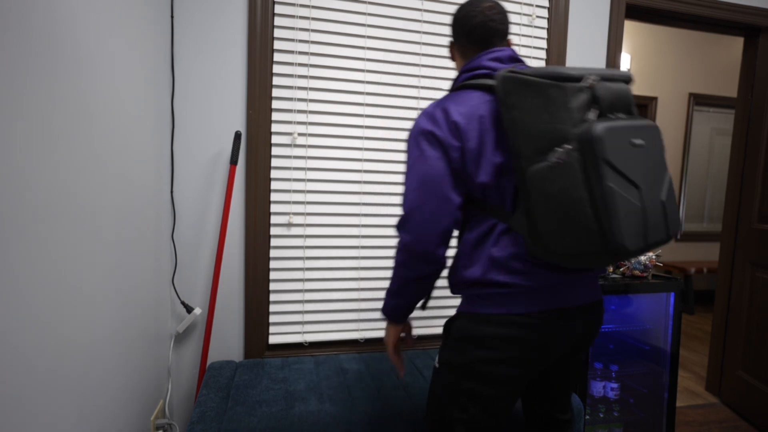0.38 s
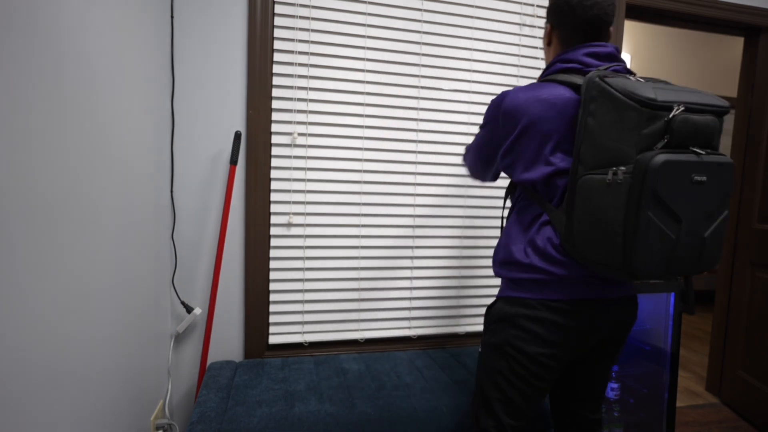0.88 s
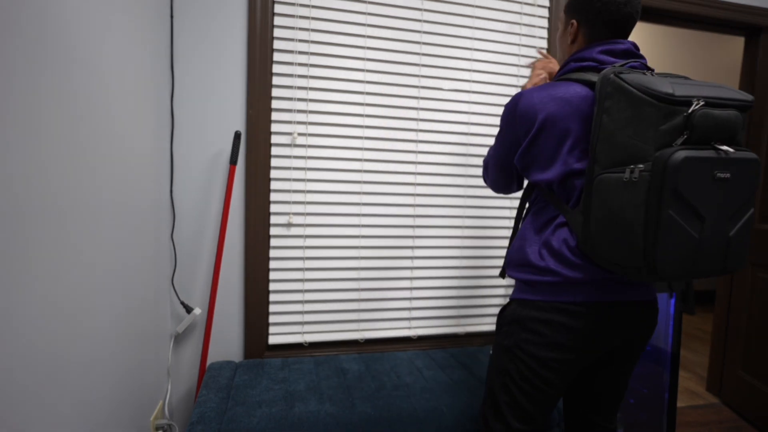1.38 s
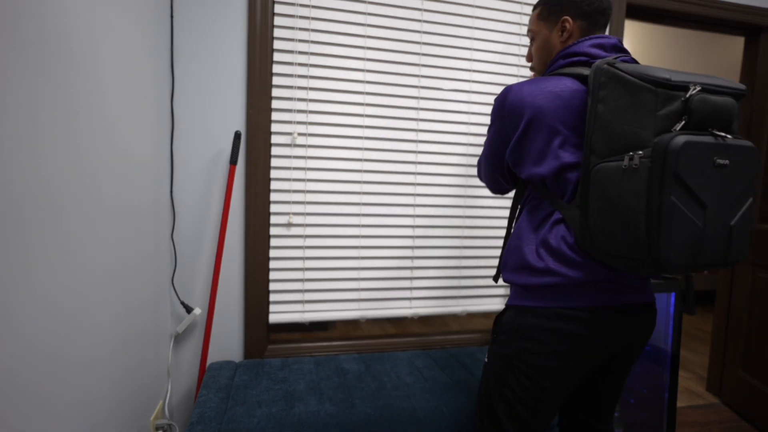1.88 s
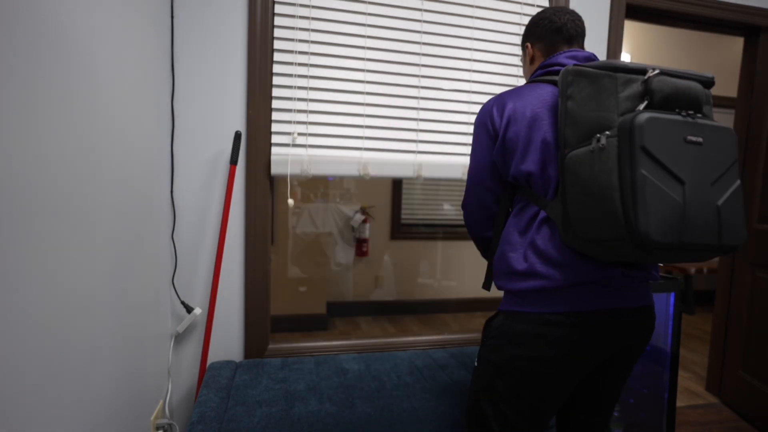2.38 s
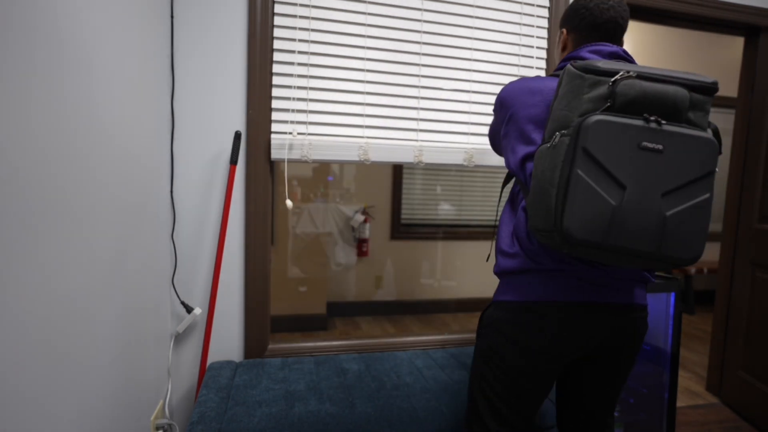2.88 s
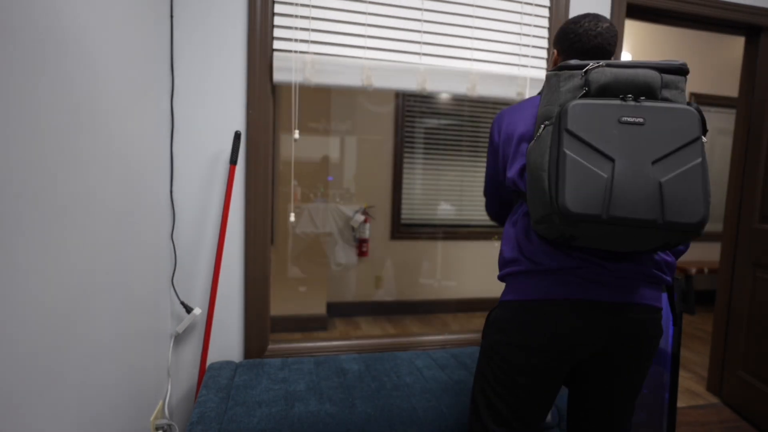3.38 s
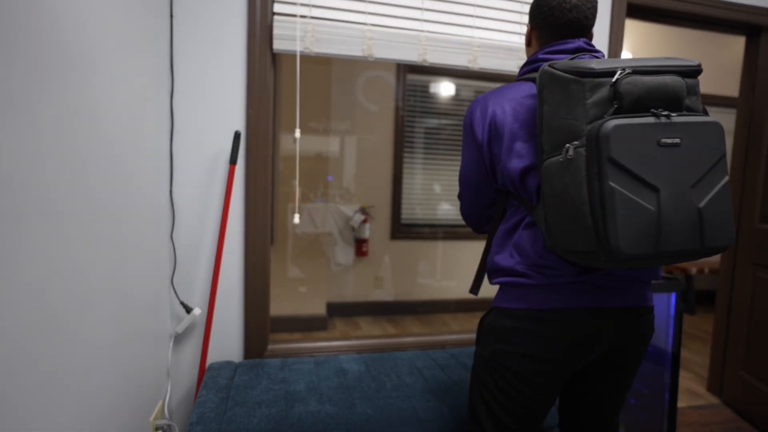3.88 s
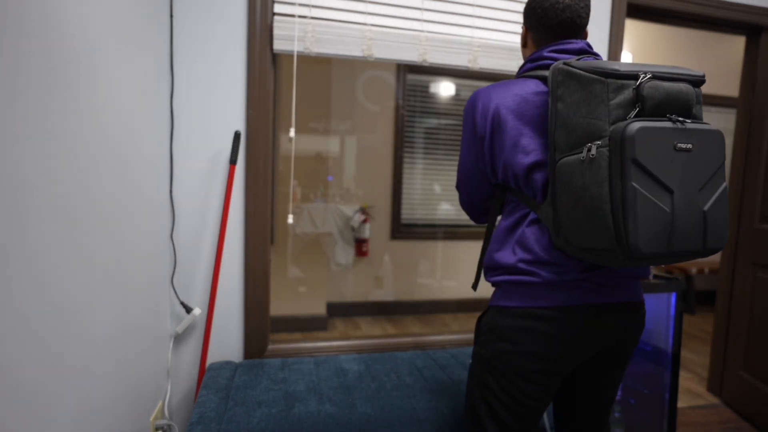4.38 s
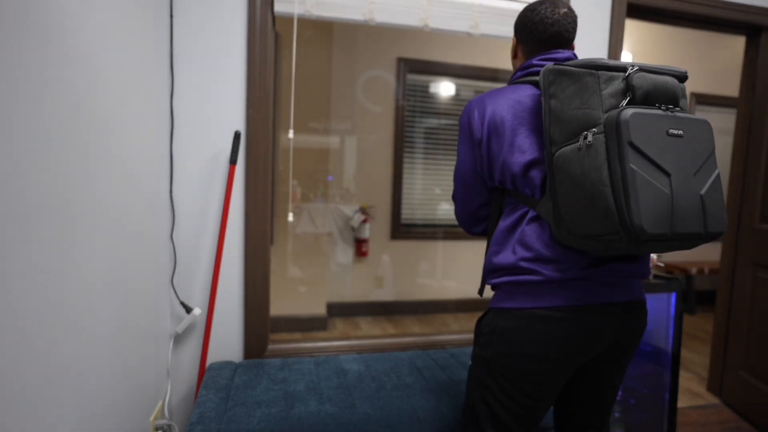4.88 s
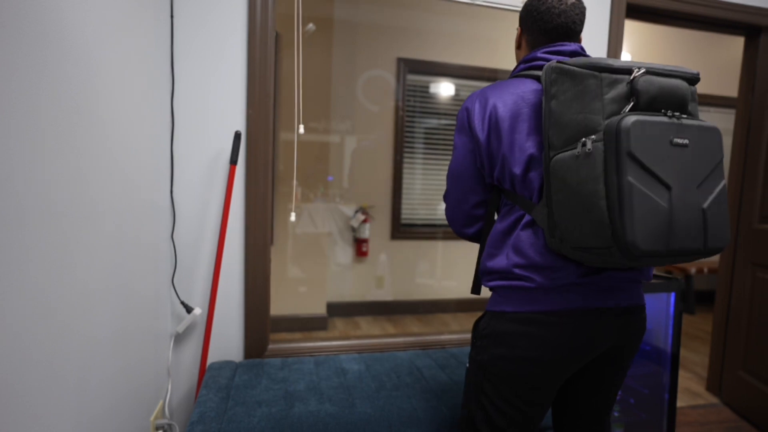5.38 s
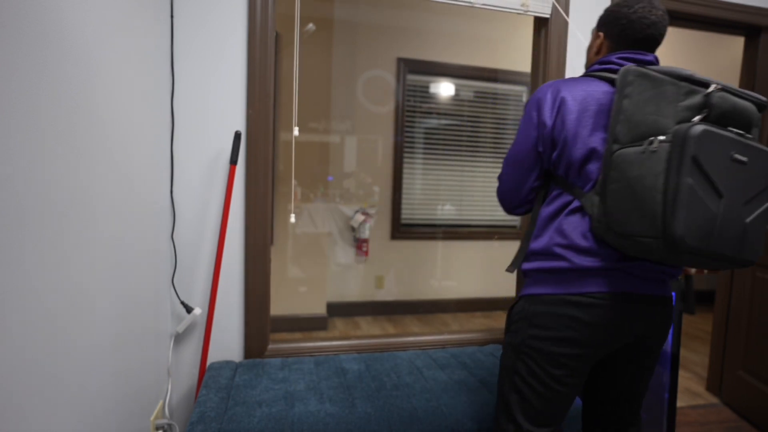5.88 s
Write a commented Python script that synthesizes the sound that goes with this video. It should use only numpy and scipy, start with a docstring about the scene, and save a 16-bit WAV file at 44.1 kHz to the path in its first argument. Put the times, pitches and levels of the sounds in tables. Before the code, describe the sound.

In a small quiet room, a slatted blind clatters up in one loud haul, then two weaker pulls, with cord rustle, a bag thump and low hum.

```python
"""Pulling up a window blind

Someone with a backpack pulls up a slatted blind in a small, quiet room; the sound leans to the left.
The slats clack and jostle: bouncing contacts make them ring. Cord and cloth rustle as coloured grainy noise.
Small metal parts ting as single tones, the frame knocks, a bag thumps low and air puffs at the microphone.
Underneath, a fridge and ventilation hum as shaped noise; random echo taps make the room."""
import sys
import numpy as np
from scipy import signal
from scipy.fft import rfft, irfft
from scipy.io import wavfile
from scipy.ndimage import uniform_filter1d

SR = 44100
rng = np.random.default_rng(int(sys.argv[2]) if len(sys.argv) > 2 else 0)


def amplitude_ratio(level_db):
    """Convert a level in decibels to the matching linear amplitude (field) ratio."""
    exponent = np.asarray(level_db, float) / 20
    return 10 ** exponent


def transcribe(u):
    """Save the signal u as a 16-bit wav file named by the first command-line argument.

    u: samples, shape (n,) or (channels, n), limited to [-1, 1]; the rate is SR.
    q: integer samples, one column per channel.
    """
    v = np.clip(np.atleast_2d(u).T, -1, 1)
    q = np.round(v * 32767).astype(np.int16)
    wavfile.write(sys.argv[1], SR, q)


N = 275184  # length of the scene [samples]

# low ringing of slats and rail: (frequency [Hz], width [Hz], relative level [dB])
LOW_BODY = [(350, 96, -18.5), (572, 180, 1.5), (702, 70, 3), (790, 190, 6), (880, 230, 4.5),
            (1015, 100, -3), (1143, 280, -15.5), (1500, 350, -4.5)]
# bright colour shared by slats, hiss and ticks: (frequency [Hz], relative level [dB])
BRIGHT_COLOUR = [(3000, -30), (5000, -8.5), (6500, 1.5), (8600, 1), (11600, 3), (14400, -0.5),
                 (15800, -11.5)]
# duller colour of cloth and cord rubbing: (frequency [Hz], relative level [dB])
RUB_COLOUR = [(700, -33.5), (1300, -2.5), (2000, -2), (3000, -3.5), (4500, -5), (7000, -14), (10000, -39.5)]
# how hard the cord is hauled, one curve for each of the three pulls: (time [s], effort [dB])
PULLS = [
    [(1.75, -105), (1.968, -71), (2.074, -54), (2.216, -39.5), (2.29, -41), (2.346, -44.5), (2.526, -72.5),
     (2.65, -103)],
    [(3.05, -79.5), (3.184, -66), (3.316, -57), (3.372, -49.5), (3.428, -58), (3.542, -61), (3.602, -76.5),
     (3.7, -97.5)],
    [(4.69, -87), (4.715, -63.5), (4.77, -71), (4.879, -64.5), (4.95, -68.5), (5.07, -67.5), (5.1, -69),
     (5.19, -64.5), (5.237, -73), (5.32, -88)],
]


def evened(x):
    """Scales a sound to an rms of 1."""
    return x / np.sqrt(np.mean(x ** 2) + 1e-20)


def read(points, hz):
    """Reads a table of (frequency, value) between its points, on a log-frequency axis."""
    f, value = np.transpose(points)
    return np.interp(np.log(hz + 1), np.log(f + 1), value)


def curve(s, db):
    """Draws a control in dB for every sample, silent outside its span."""
    return np.interp(np.arange(N) / SR, s, db, left=-300, right=-300)


def bump(s, half_s):
    """A smooth rise and fall about time s."""
    return np.exp(-((np.arange(N) / SR - s) / half_s) ** 2)


def swell(t, rise_ms, t60):
    """A soft start and an exponential fall, by 60 dB in t60 seconds."""
    rise = 1 - np.exp(-1000 * t / max(rise_ms, .02))
    return rise * amplitude_ratio(-60 * t / max(t60, .004))


def add(mix, s, sound):
    """Mixes a sound in at time s, which may lie before the start."""
    at = round(s * SR)
    part = mix[max(at, 0):][:len(sound) + min(at, 0)]
    part += sound[max(-at, 0):][:len(part)]


def resonate(x, hz, width):
    """A two-pole resonance of gain 1 at its centre."""
    return signal.lfilter(*signal.iirpeak(hz, hz / max(width, 1), SR), x)


def ring(x, body, chance_db=0, edge_hz=6000):
    """Adds up an object's resonances, each with its own chance level, dulled above the edge."""
    each_db = chance_db + np.zeros(len(body))
    modes = 0
    for (hz, width, db), chance in zip(body, each_db):
        modes = modes + amplitude_ratio(db + chance) * resonate(x, hz, width) / np.sqrt(width)
    return signal.lfilter(*signal.butter(2, edge_hz, fs=SR), modes)


def colour(x, points):
    """Filters with the given spectrum; nothing sounds before its cause."""
    hz = np.abs(np.fft.fftfreq(2048, 1 / SR))
    log_gain = np.log(amplitude_ratio(np.maximum(read(points, hz), -100)))
    # the Hilbert transform finds the phase that puts the energy as early as possible
    taps = np.fft.ifft(np.exp(np.conj(signal.hilbert(log_gain)))).real[:1024]
    return signal.oaconvolve(x, taps)[:len(x)]


def crackle(per_s, spread_db, hiss):
    """Sparse clicks of uneven size in a bed of noise."""
    size = amplitude_ratio(spread_db * np.minimum(rng.exponential(1, N), 4)) * rng.choice([-1, 1], N)
    clicks = size * (rng.random(N) < per_s / SR)
    return evened(evened(clicks) + hiss * rng.standard_normal(N))


def room_tone():
    """Ventilation is shaped noise; the low hum of motors is noise through narrow resonances."""
    # colour of the ventilation: (frequency [Hz], relative level [dB])
    air_colour = [(12, -42.5), (20, 4), (53, 4), (123, -7), (167, -6), (469, -14), (603, -32.5), (943, -21),
                  (1650, -51), (2720, -30), (4030, -43.5), (14100, -43.5), (15800, -45.5)]
    # two hum bands, lower and upper: (frequency [Hz], width of each resonance [Hz])
    hum_bands = [(60, 4), (118, 18)]
    # resting level of the lower and the upper band [dB]
    hum_db = [-69, -68.5]
    # the level of the low noise drifts by chance:
    # (time [s], half length [s], lower band change [dB], upper band change [dB])
    level_drifts = [(.2, .2, -0.5, -1), (0.634, .12, -10, -4.5), (1.055, 0.22, 1, -0.5),
                    (2.596, 0.094, 12, -5.5), (3.08, 0.087, 8.5, -15), (3.2, 0.091, -13, -1),
                    (3.633, 0.17, 7, 8.5), (4.298, 0.79, -5, -3.5), (4.929, 0.049, 5, 3),
                    (5.62, 0.17, 5, 3), (6.097, 0.18, -13, 6.5)]
    hz = np.fft.rfftfreq(N, 1 / SR)
    air = irfft(rfft(rng.standard_normal(N)) * amplitude_ratio(read(air_colour, hz)), N)
    levels_db = np.c_[hum_db] + sum(np.c_[db] * bump(s, half_s) for s, half_s, *db in level_drifts)
    out = amplitude_ratio(-67) * evened(air)
    for level_db, (centre, width) in zip(levels_db, hum_bands):
        once = resonate(rng.standard_normal(N), centre, width)
        out += amplitude_ratio(level_db) * evened(resonate(once, centre, width))
    return out


def puffs():
    """Air from closing slats pushes on the microphone, then the pressure swings back more slowly."""
    # (time [s], level before the factor [dB], time until the pressure crosses zero [ms], signed factor)
    puff_list = [(2.150, -57, 9.4, 0.67), (2.1855, -11, 1.98, 0.55), (2.211, -33, 2.56, -1),
                 (2.268, -31.5, 3.1, -2.2), (2.2981, -5.5, 0.98, 0.73), (5.232, -22, 1.57, 0.074)]
    out = np.zeros(N)
    for s, db, ms, factor in puff_list:
        u = np.arange(4000) / SR / (ms / 1000)
        push = np.sin(np.pi * u ** 0.35) * np.exp(-.55 * u) * (1 - np.exp(-u / 0.16))
        add(out, s, factor * amplitude_ratio(db) * 1.32 * push)
    return out


def thumps():
    """Bag and pull make couch and window frame ring low for a few cycles, as fading sines."""
    # one row a mode: (time [s], level [dB], frequency [Hz], t60 [s], rise [ms])
    thump_list = [(-.011, -27.5, 66, 0.14, 1.7), (.068, -31, 110, 0.14, 14), (.004, -52, 340, 0.099, 3),
                  (.02, -42.5, 526, 0.058, 11), (0.068, -45, 209, 0.089, 6), (.068, -52, 496, 0.043, 2.8),
                  (5.229, -53, 176, 0.19, 2)]
    out, t = np.zeros(N), np.arange(SR // 2) / SR
    for s, db, hz, t60, rise_ms in thump_list:
        add(out, s, amplitude_ratio(db) * swell(t, rise_ms, t60) * -np.sin(2 * np.pi * hz * t))
    return out


def tings():
    """Loose metal rings with one mode each, roughened by the rattling contact."""
    # the parts rattle: (time [s], level [dB], part)
    ting_list = [(.043, -66, "tab"), (.15, -82, "slider"), (.177, -74, "tab"), (.235, -76, "slider"),
                 (.538, -72, "tab"), (.596, -73, "tab"), (.60, -82, "ring"), (1.045, -79, "ring"),
                 (1.05, -78, "pawl"), (1.055, -73, "tab"), (1.06, -68, "clip"), (1.163, -57, "clip"),
                 (1.562, -64, "ring"), (3.340, -55, "pin"), (3.342, -50, "pawl"), (3.357, -52, "pawl"),
                 (3.368, -54, "pin"), (4.706, -60, "pin"), (4.706, -60, "pawl"), (4.72, -60, "latch"),
                 (4.872, -57, "lock"), (4.915, -63, "roller"), (4.937, -60, "roller"), (5.178, -64, "lock"),
                 (5.961, -75, "tab")]
    # small metal parts by name: (frequency [Hz], t60 [s])
    metal_parts = dict(tab=(14650, .13), slider=(7100, .15), ring=(6300, .09), pawl=(8550, .06),
                   pin=(11200, .13), clip=(2600, .01), lock=(3080, .045), roller=(4300, .03),
                   latch=(2200, .08))
    out, t = np.zeros(N), np.arange(SR // 3) / SR
    for s, db, part in ting_list:
        hz, t60 = metal_parts[part]
        rattle = evened(uniform_filter1d(rng.standard_normal(len(t)), size=160))
        tone = (1 + .7 * rattle) * np.sin(2 * np.pi * hz * t)
        add(out, s, amplitude_ratio(db) * swell(t, 1.5, t60) * tone)
    return out


def knocks():
    """The pull knocks on the wooden frame, whose many modes blur into a short coloured burst."""
    # (time [s], level [dB], t60 [s], hard-tip tick relative to the body's peak [dB], rise [ms])
    knock_list = [(1.5594, -40, 0.104, -18, 1.6), (5.2285, -30, 0.14, -33, 0.59)]
    # colour of the wooden frame: (frequency [Hz], relative level [dB])
    frame_colour = [(100, -31), (220, -3.5), (420, -11.5), (680, 2), (900, -4), (1200, -4), (1600, -9.5),
                    (2200, -16), (2950, -16), (4200, -26.5), (6500, -27), (15500, -47.5)]
    out, t = np.zeros(N), np.arange(8000) / SR
    for s, db, t60, tick_db, rise_ms in knock_list:
        noise = rng.standard_normal(8000)
        body = colour(noise * swell(t, rise_ms, t60), frame_colour)
        tick = colour(noise * swell(t, .4, 0.72 * t60), BRIGHT_COLOUR)
        add(out, s, amplitude_ratio(db) * (body / np.abs(body).max() + amplitude_ratio(tick_db) * tick / tick[:400].std()))
    return out


def strokes():
    """Brushing straps and sleeves, and the noisy part of clicks and scrapes: bright hiss to dull rub."""
    # (time [s], level [dB], rise [ms], t60 [s], dullness [0-1])
    stroke_list = [(.009, -58, 0.84, 0.016, .9), (.04, -66.5, 12, 0.21, 0.04), (.175, -74, 5.6, 0.12, .1),
                   (.535, -79, 3, .08, 0), (0.591, -69, 14, 0.16, 0), (1.0, -67, 3, 0.054, 0.2),
                   (1.05, -66, 8, 0.12, .2), (1.163, -56, .5, .02, 0.67), (1.175, -80, 10, .1, .1),
                   (1.668, -45, 7.7, 0.098, 0.13), (1.691, -60.5, 7.1, 0.11, 0.95),
                   (1.86, -70, 10, .08, 0.4), (2.739, -70, 34, 0.38, 0.8), (3.339, -37.5, 2.8, 0.22, 0.4),
                   (4.706, -43.5, 1.04, 0.078, 0.7), (5.084, -73.5, 13, .3, 0.7),
                   (5.54, -64.5, 1.6, 0.19, 0.37)]
    out, t = np.zeros(N), np.arange(12000) / SR
    for s, db, rise_ms, t60, dull in stroke_list:
        noise = rng.standard_normal(12000)
        hiss, rub = evened(colour(noise, BRIGHT_COLOUR)), evened(colour(noise, RUB_COLOUR))
        stroke = (1 - dull) * hiss + dull * rub
        add(out, s, amplitude_ratio(db) * stroke * swell(t, rise_ms, t60))
    return out


def rustle():
    """Fibres slide: rub and hiss share a fine grain, over a muffled scuffing."""
    # the person moves: (time [s], cloth rubbing [dB], sheen [dB]: smooth nylon hisses, fleece does not)
    moves = [(.05, -84.5, 0), (.3, -90, 1.5), (.46, -81, -6), (.56, -83.5, 0), (.72, -85, -2),
             (.86, -78, -5.5), (.99, -80, -4.5), (1.08, -84.5, 3.5), (1.19, -86.5, 6.5), (1.3, -79, -7),
             (1.4, -80.5, -1), (1.54, -78, -3), (1.62, -77, -4), (1.8, -77, -1.5), (2.0, -79, 5.5),
             (2.621, -86.5, -3), (2.809, -71, -4), (2.93, -82.5, 0), (3.7, -85, -2), (4.0, -84, -0.5),
             (4.15, -91, 2.5), (4.65, -81.5, -1.5), (5.421, -89.5, -7), (5.6, -82.5, 7), (5.72, -80.5, 5.5),
             (5.85, -81.5, -1.5), (6.0, -75.5, -4.5), (6.24, -78.5, -1)]
    # muffled scuffs and scrapes, some after a jolt: (time [s], level [dB], t60 [s])
    scuffs = [(0, -58, .3), (.065, -72.5, .25), (1.42, -71, .5), (1.575, -57.5, 0.48), (3.97, -76.5, 0.47),
              (5.085, -58, 0.59), (5.23, -55, 0.37), (5.68, -71, 0.14)]
    # muffled colour of the scuffing: (frequency [Hz], relative level [dB])
    scuff_colour = [(100, -25), (250, -3.5), (500, -2), (900, -6), (1400, -14), (3000, -33)]
    t = np.arange(N) / SR
    # each layer follows the effort by its own amount: level at -60 dB of effort, then dB per dB
    effort_db = np.max([curve(*np.transpose(rows)) for rows in PULLS], axis=0)
    rub = amplitude_ratio(-64.5 + 0.96 * (effort_db + 60))
    hiss = amplitude_ratio(-63.5 + 1.15 * (effort_db + 60))
    scuff = amplitude_ratio(-67 + 0.68 * (effort_db + 60))
    s, move_db, sheen_db = np.transpose(moves)
    move_db, sheen_db = np.interp(t, s, move_db), np.interp(t, s, sheen_db)
    rub = rub + amplitude_ratio(move_db)
    hiss = hiss + amplitude_ratio(move_db + sheen_db)
    scuff = scuff + amplitude_ratio(-76.5 + 0.39 * (move_db + 82))
    for at_s, db, t60 in scuffs:
        add(scuff, at_s, amplitude_ratio(db) * swell(t[:SR], 16, t60))
    fibres = crackle(per_s=2500, spread_db=2.5, hiss=2)
    coarse = crackle(per_s=400, spread_db=2.5, hiss=2)
    out = rub * evened(colour(fibres, RUB_COLOUR))
    out += hiss * evened(colour(fibres, BRIGHT_COLOUR))
    return out + scuff * evened(colour(coarse, scuff_colour))


def clack_body(s):
    """The clack's modes at time s: they drop in pitch as the stack of slats grows heavier."""
    # (frequency before the stack's factor [Hz], width [Hz], relative level [dB])
    clack_modes = [(1714, 220, -1), (2990, 430, 0.5), (3160, 330, 2), (3600, 190, -3), (4300, 1900, -5.5)]
    light, full, from_s, grows_s = 1.18, 0.95, 1.835, 0.41  # two pitch factors, then start and pace [s]
    factor = full + (light - full) * np.exp(-max(s - from_s, 0) / grows_s)
    return [(hz * factor, width, db) for hz, width, db in clack_modes]


def blow(modes, db, hardness_db):
    """A contact, then quick uneven bounces along the slat, drives low body, clack and treble."""
    t = np.arange(6000) / SR
    bounces = rng.standard_normal(6000) * (0.27 + (rng.random(6000) < .008) * 2.8)
    t60 = .05 * np.exp(0.22 * rng.standard_normal())  # no two slats rattle equally long
    first_touch = 1 + 5.5 * np.exp(-t / 0.00031)  # stands out over the bounces
    drive = bounces * swell(t, .25, t60) * first_touch
    low = ring(drive, LOW_BODY, 3.5 * rng.standard_normal(len(LOW_BODY)), edge_hz=1700)
    clack = ring(drive, modes, 4 * rng.standard_normal(len(modes)))
    tint = [(hz, level_db + 3.5 * rng.standard_normal()) for hz, level_db in BRIGHT_COLOUR]
    treble = colour(drive, tint)
    # clack and treble are set by their first 10 ms; a hard blow is brighter
    start = slice(0, SR // 100)
    out = low / np.abs(low).max()
    out += amplitude_ratio(-12.5 + hardness_db) * clack / clack[start].std()
    out += amplitude_ratio(-14.5 + 1.4 * hardness_db) * treble / treble[start].std()
    return amplitude_ratio(db) * out


def jostle(body, per_s, edge_hz):
    """Many small touches, each finding one mode, so that the colour glints about."""
    touched = (ring(crackle(per_s, spread_db=1.0, hiss=0.93), [mode], edge_hz=edge_hz) for mode in body)
    return evened(sum(touched))


def blind():
    """Single blows of the slats over the dense jostling of the stack, which follows each pull."""
    # (time [s], level of the low body [dB], hardness [dB]: edge-on contacts are bright, flat ones dull)
    blow_list = [(1.423, -66, 6), (1.446, -52.5, -12), (1.582, -43.5, -5), (1.676, -54.5, 1),
                 (1.867, -55.5, 3), (1.917, -54, -6), (1.962, -48, -4.5), (2.019, -46, -2),
                 (2.054, -46, 4.5), (2.066, -35, -12), (2.095, -29, 4), (2.129, -27.5, -1),
                 (2.153, -27, 0.5), (2.182, -27.5, 6.5), (2.211, -22, 2), (2.222, -35, 7.5),
                 (2.239, -23, 2), (2.267, -21, 3), (2.297, -24.5, 6.5), (2.304, -33, 3), (2.331, -25.5, -1),
                 (2.36, -22, -3.5), (2.393, -34, 2.5), (2.436, -38.5, 1), (2.488, -40.5, -11.5),
                 (2.531, -48.5, -10), (3.134, -45, -6), (3.151, -39, -6.5), (3.158, -44.5, -2.5),
                 (3.214, -43, -9), (3.222, -39, -5.5), (3.254, -36.5, -5.5), (3.276, -47.5, -10),
                 (3.306, -35, -3), (3.327, -32.5, -2), (3.338, -44, 11.5), (3.344, -47.5, 10.5),
                 (3.368, -49, 4), (3.412, -37.5, -5), (3.441, -42, -2), (3.457, -37.5, -7),
                 (3.478, -37.5, -0.5), (3.509, -41, -2), (3.837, -60.5, -6.5), (3.898, -76, 4),
                 (3.969, -68.5, -7), (4.369, -60, -4.5), (4.702, -47.5, 4), (4.804, -43.5, 1),
                 (4.849, -46, 1), (4.871, -63.5, 8.5), (4.934, -47, 1.5), (4.948, -46.5, -1.5),
                 (5.01, -42.5, -2.5), (5.081, -44, -5), (5.178, -55, -3)]
    delay_s = .0012  # short fixed delay of each blow after its listed time
    out = np.zeros(N)
    for s, db, hardness_db in blow_list:
        add(out, s + delay_s, blow(clack_body(s), db, hardness_db))
    low = jostle(LOW_BODY, per_s=200, edge_hz=1900)
    for rows in PULLS:
        s, effort_db = np.transpose(rows)
        clack = jostle(clack_body(s.mean()), per_s=89, edge_hz=7700)
        effort = uniform_filter1d(amplitude_ratio(curve(s, effort_db)), size=300)
        out += effort * (low + amplitude_ratio(-7.5) * clack)
    return out


def shaded(x):
    """The person's body shades the top treble, most when square in front of the blind."""
    top = signal.sosfiltfilt(signal.butter(2, 9600, "high", fs=SR, output="sos"), x)
    shade_db = -2.17 - 7 * bump(3.33, .4)
    return x + (amplitude_ratio(shade_db) - 1) * top


def room(x):
    """Echoes form three tails of sparse random taps, each band dying at its own speed."""
    # (frequency [Hz], t60 [s])
    decay = [(100, 0.6), (300, 0.44), (700, 0.41), (2000, 0.35), (6000, 0.4), (15000, 0.41)]
    taps, at = np.zeros((3, SR)), np.arange(260, SR - 20, 20)
    places = at + rng.integers(0, 20, (3, len(at)))
    np.put_along_axis(taps, places, rng.choice([-1., 1.], (3, len(at))), axis=1)
    hz, t, z = signal.stft(taps, SR, nperseg=256)
    tails = signal.istft(z * amplitude_ratio(-60 * t / read(decay, hz)[:, None]), SR, nperseg=256)[1]
    # the random tails take turns, six rounds a second, which evens out their chance colouring
    rounds = np.arange(N) / SR * 6 + np.arange(3)[:, None] / 3
    turns = np.sqrt(2 / 3) * np.cos(2 * np.pi * rounds)
    return signal.fftconvolve(turns * x, tails / np.linalg.norm(tails[0]), axes=1).sum(0)[:N]


def scene():
    """Near sounds with their room, plus thumps, puffs and room tone, panned to the left."""
    # gain of the left and the right channel [factor]
    pan = np.array([[4 / 3], [2 / 3]])
    near = shaded(blind() + rustle() + strokes()) + knocks() + tings()
    return pan * (near + amplitude_ratio(-8) * room(near) + thumps() + puffs() + room_tone())


def roll_off(x):
    """The treble ends steeply here."""
    return signal.sosfilt(signal.butter(12, 15970, fs=SR, output="sos"), x)


def record(dry):
    """Cuts away the treble above about 15.8 kHz with a steep filter."""
    low_pass = signal.firwin(511, 15800, window=("kaiser", 9), fs=SR)
    limited = signal.oaconvolve(dry, low_pass[None], "same")
    return roll_off(limited)


dry = scene()
out = record(dry)
transcribe(out)
```